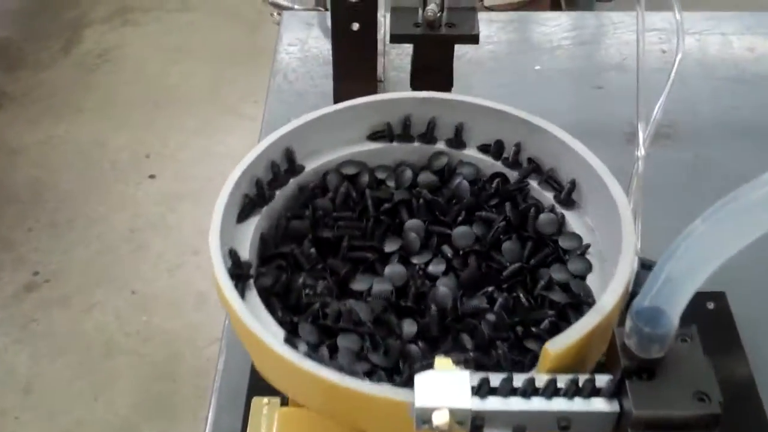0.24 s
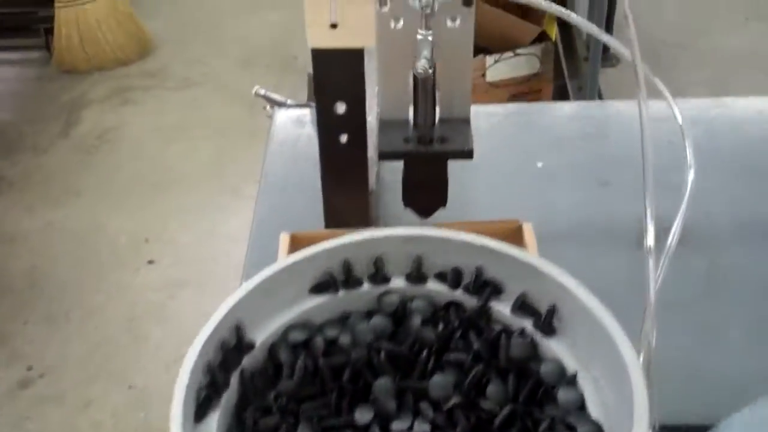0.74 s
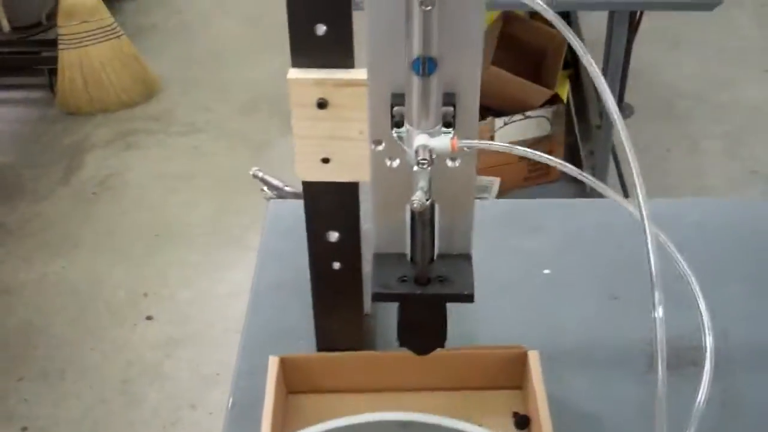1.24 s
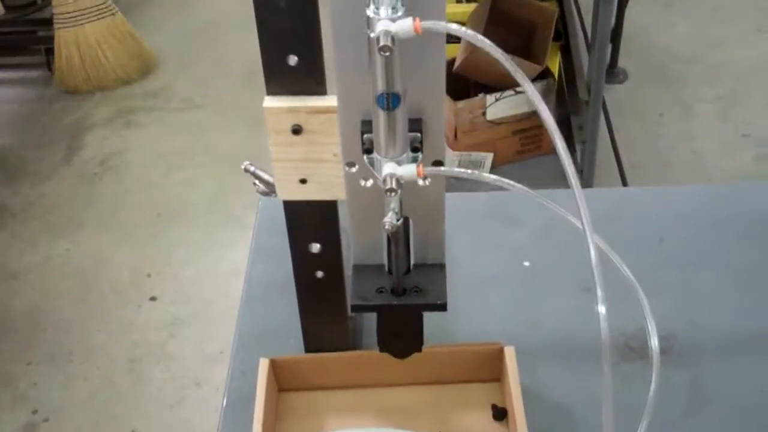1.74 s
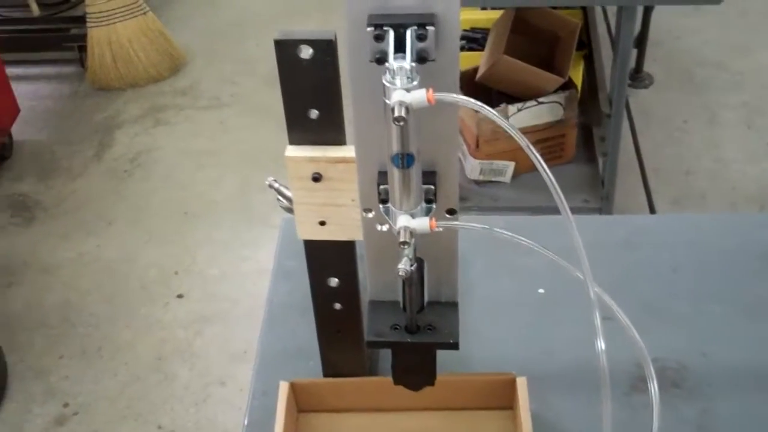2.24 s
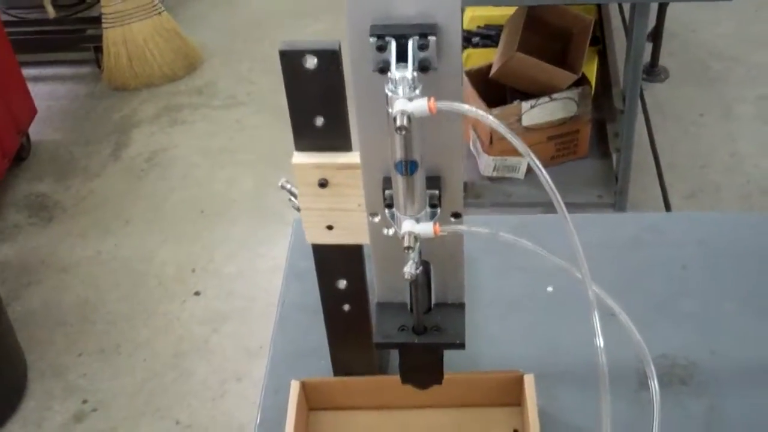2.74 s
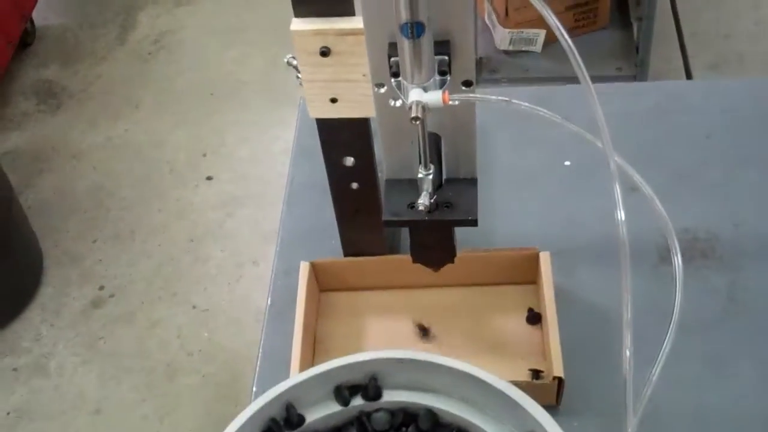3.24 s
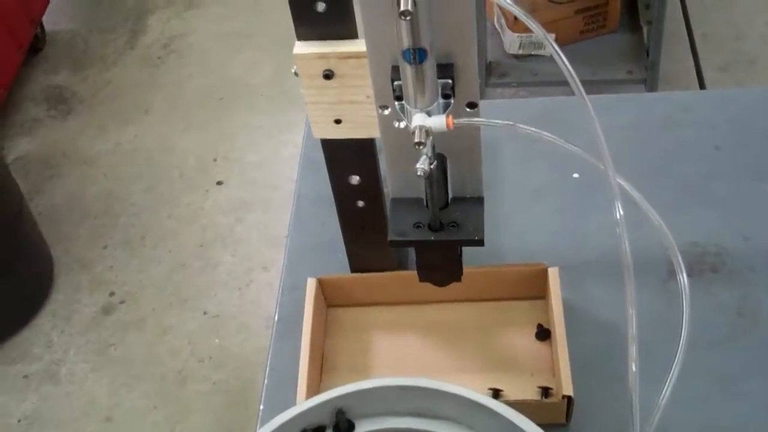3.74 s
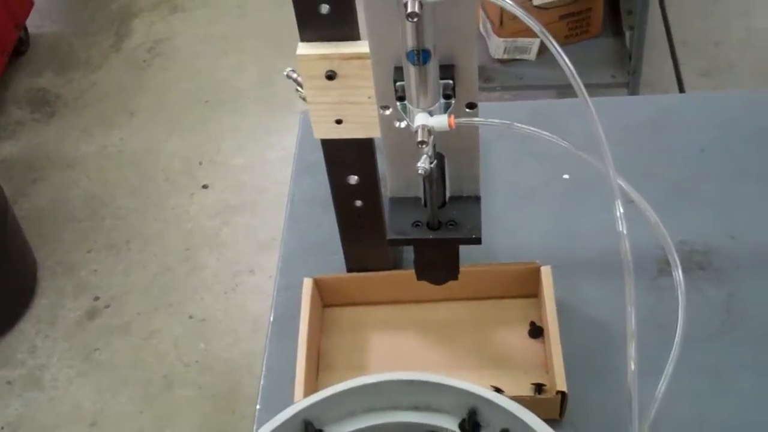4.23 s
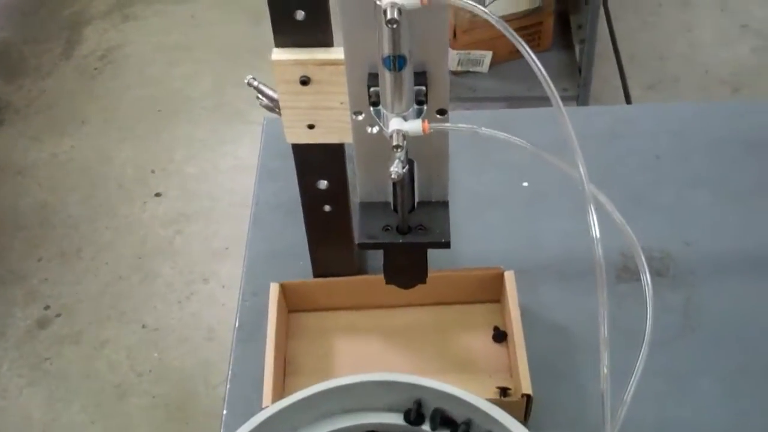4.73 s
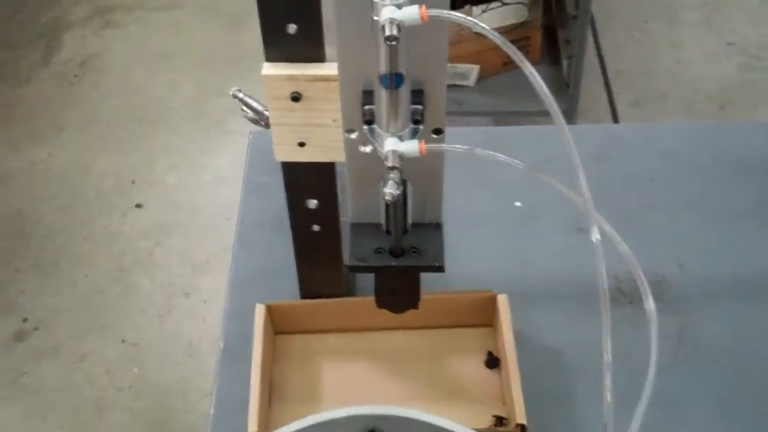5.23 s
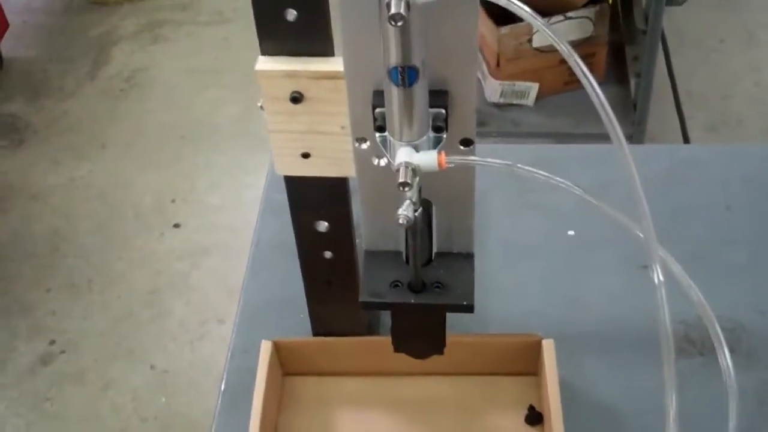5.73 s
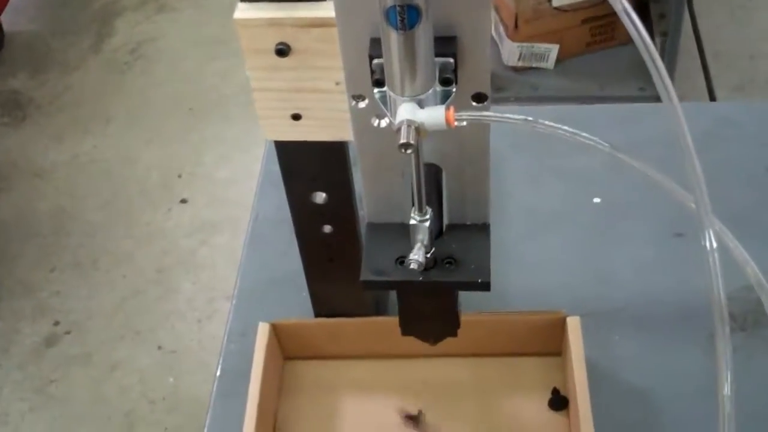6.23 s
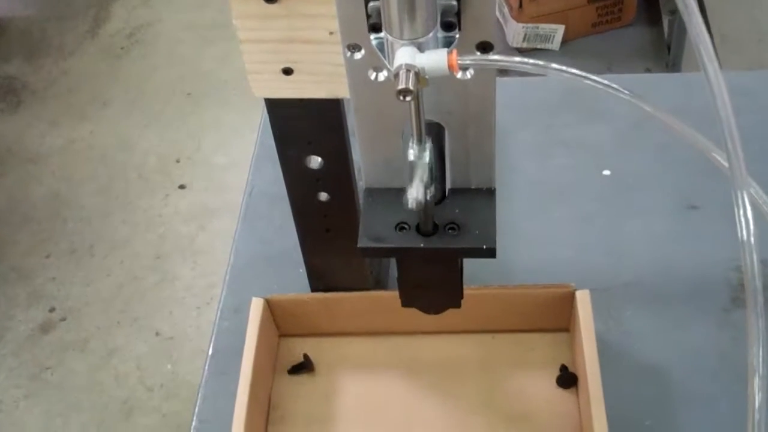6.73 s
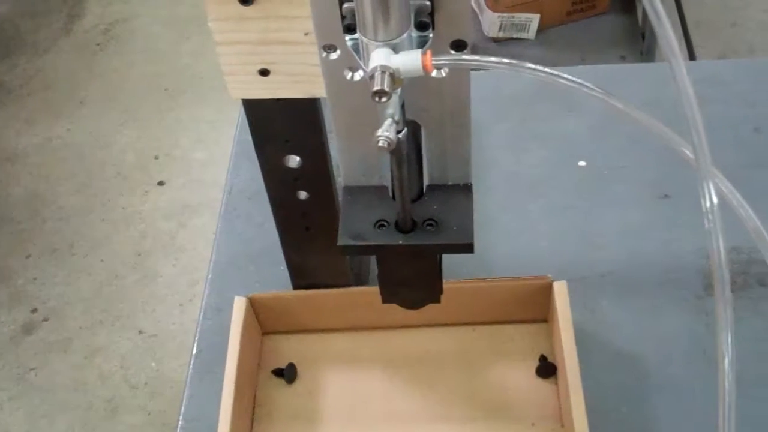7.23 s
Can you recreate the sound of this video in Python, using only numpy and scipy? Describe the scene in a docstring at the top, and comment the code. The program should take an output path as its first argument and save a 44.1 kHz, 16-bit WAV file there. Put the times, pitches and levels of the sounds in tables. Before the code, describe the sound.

A loud, bright compressed-air hiss runs throughout, with a steady low hum near 120 Hz and light chatter from a vibrating bowl of plastic fasteners. Right at the start a valve spits, a cylinder clacks, and a fastener taps into a wooden box at about 0.1 s, bouncing softly. At 0.5 s another spit and small tap precede the piston's return clack at 0.8. Around 1.5 an escapement scrapes and knocks; from 1.8 to 2.3 feed air roars, popping and buffeting the close microphone, mostly on the right. It shuts with a spit and knock, and the hiss sags briefly. The cycle repeats: drive at 3.2, return clack at 3.7, knock at 4.4, longer blast from 4.7 to 5.4. The hiss grows nearer and sharper. A third drive comes at 6.2, a strong return clack at 6.9, and a final knock at 7.4. Short shop reverberation.

```python
"""A vibratory bowl feeder hums on a shop bench under a compressed-air jet: harmonics and chatter under shaped noise.
Three times an air cylinder drives a plastic fastener into a wooden box and draws back, with filtered-noise
valve spits and decaying modes for the blows; then an escapement scrapes and knocks. After the first two knocks
a blast of feed air, gated noise, roars and buffets the microphone; the escapement slides back,
and the jet sags for a moment until the air line has refilled."""
import sys
import numpy as np
from scipy import signal
from scipy.fft import rfft, irfft
from scipy.io import wavfile

SR = 44100
rng = np.random.default_rng(int(sys.argv[2]) if len(sys.argv) > 2 else 0)


def dump_mix(stems):
    """Bounce the given channels to the path in sys.argv[1] as a 16-bit WAV at rate SR."""
    frames = np.atleast_2d(stems).T  # one column per channel
    limited = np.clip(frames, -1, 1)  # hard clip at full scale
    pcm = np.round(limited * 32767).astype(np.int16)
    wavfile.write(sys.argv[1], SR, pcm)


N = 329427
T = np.arange(N) / SR
HZ = np.fft.rfftfreq(N, 1 / SR)

# hiss as the microphone moves about the jet, before trims: time_s, level_db, beamed_sizzle_db
JET_LEVELS = [(0.15, -23.5, -25.5), (0.5, -21.5, -23.5), (0.9, -22, -21.5), (1.35, -21.5, -21.5),
              (1.7, -21, -22), (2.55, -22.5, -19), (2.85, -22, -20), (3.25, -22.0, -20), (3.7, -22, -20.5),
              (4.35, -22.5, -22), (4.55, -22.5, -20.5), (5.7, -20.5, -19.5), (6.25, -18.5, -18),
              (6.65, -17.5, -18), (7.1, -17.5, -17.5), (7.35, -17.5, -17.5)]
# spectrum of the hiss: frequency_hz, density_db
JET_SPECTRUM = [(500, -23), (1500, -17.5), (1800, -12.5), (2080, -6), (2780, -3), (2980, -2), (3900, 2),
                (4600, 1), (5600, -1.5), (7000, 3), (9000, 7.5), (10000, 5), (11500, 4), (13400, 5.5),
                (14100, 5)]
# left-right likeness of the hiss: frequency_hz, likeness_0_to_1
JET_LIKENESS = [(500, .6), (1500, .85), (3000, .992), (5000, .99), (6300, .74), (9000, .7), (12000, .6),
                (14000, .7)]
# phase by which left leads in the hiss: frequency_hz, lead_rad
JET_PHASE_LEAD = [(100, 0), (5200, 0), (8000, -.7), (10000, -1.1), (12000, -1.35), (14000, -1.75)]
# lower shoulder of the hiss, below its edge: time_s, level_db
SHOULDER_LEVELS = [(0.2, -38), (0.5, -38.5), (1.0, -38.5), (1.25, -38.5), (1.45, -38.5), (1.6, -33),
                   (1.75, -34.5), (2.45, -40), (2.8, -41), (3.35, -38.5), (4.05, -41), (4.38, -40),
                   (4.55, -33.5), (5.6, -40.5), (6.0, -39.5), (6.35, -37.5), (6.7, -37.5), (6.95, -37),
                   (7.3, -38.5)]
# crossover from the shoulder to the rest of the hiss: lower_hz, upper_hz
SHOULDER_EDGE = [2750, 2950]
# loss of jet pressure after each blast: sag_start_s, pressure_back_s
PRESSURE_SAGS = [(2.277, 2.405), (5.39, 5.545)]
SAG_FALL_S, REFILL_S = 0.06, 0.049
SAG_BODY_DB, SAG_TREBLE_DB, SAG_SIZZLE_DB = -2.5, -5.5, -5.5
# the body of the hiss, its balance and the rattle in the bowl all follow the rise above this level
USUAL_DB = -21.4
BODY_DB, BODY_SHARE = -25.5, 0.75
PAN_DB, PAN_SHARE = .5, 0.2
# the stereo image narrows as the microphone turns into the beam of sizzle
WIDTH_DB, NARROWING_SHARE = 0.45, 0.69

HUM_HZ = 119.9
# fundamental of the feeder's hum: time_s, rms_level_db
HUM_LEVELS = [(0.1, -44.5), (0.4, -42.0), (1.6, -43.5), (2.5, -46), (3.85, -44.5), (5.7, -43.5),
              (6.55, -42.5), (6.8, -39), (7.35, -42.5)]
# odd harmonics relative to the hum: harmonic_number, level_db
ODD_HARMONICS = [(3, -18), (5, -21.5)]
# second harmonic of the hum: time_s, rms_level_db
SECOND_HARMONIC_LEVELS = [(0.4, -52.5), (0.9, -52), (1.3, -65), (2.6, -52.5), (3.0, -70), (3.3, -61),
                          (4.25, -56), (5.75, -64), (6.05, -55)]
# ring of the bowl at the fourth harmonic: time_s, rms_level_db
BOWL_RING_LEVELS = [(2.6, -60.5), (5.6, -57), (5.75, -45.5), (6.1, -45.5), (6.27, -49), (6.45, -45.5),
                    (6.72, -48.5), (6.95, -55), (7.25, -46)]
# spectrum of the chattering fasteners: frequency_hz, density_db
RATTLE_SPECTRUM = [(25, -10), (80, 0.5), (170, 1.5), (300, 0), (430, 6), (650, 3.5), (950, 5.5),
                   (1250, 2.5), (2000, 3), (5000, -50)]
RATTLE_DB, RATTLE_SHARE = -49, 1
# singing rim of the bowl: time_s, rms_level_db
RIM_LEVELS = [(0.3, -51.5), (1.3, -50.5), (4.3, -50.5), (5.8, -63)]
RIM_HZ, RIM_WIDTH_HZ = 1079, 80

# the piston drives a fastener out: spit_s, spit_db, spit_hz, spit_length_s, travel_s, plate_knock_db,
# clack_db, flight_s, landing_db, jolt_db
DRIVE_STROKES = [(0.02, -4.5, 11700, 0.0075, 0.016, -24.5, -18, 0.072, -18.5, -28),
                 (3.189, -10, 11800, 0.0087, 0.016, -17.5, -15, 0.082, -24, -38),
                 (6.17, -7, 11660, 0.01, .016, -15, -15, .082, -18, -36)]
PUSH_WIDTH_HZ = 580
# a faint clatter of piston and plate, about 4 ms before each drive stroke's valve spit;
# its lead is counted from the end stop and its level from the blow there
CLATTER_LEAD_S, CLATTER_DB = 0.02, -11
# the fastener bounces once in the box
BOUNCE_S, BOUNCE_DB = 0.15, -8
# the piston draws back: spit_s, spit_db, spit_length_s, track_tap_delay_s, track_tap_db, travel_s,
# plate_knock_db, clack_db, plate_brightness_db_per_octave
RETURN_STROKES = [(0.512, -12.5, 0.011, .037, -25, 0.2985, -31.5, -11, 16.5),
                  (3.397, -11.5, 0.0066, .032, -24.5, .292, -17, -15, -0.5),
                  (6.588, -17, 0.016, .033, -22, .2935, -12.5, -8.5, -3)]
RETURN_HZ, RETURN_WIDTH_HZ = 10770, 1900
# clack of the piston on its end stop: mode_hz, mode_db, t60_s
CYLINDER_MODES = [(2760, -2, 0.018), (3140, 2, 0.0073), (3380, 0.5, 0.014), (3530, -8, 0.026),
                  (4870, -0.5, 0.015), (6700, 3.5, 0.014)]
# knock of the mounting plate just after each clack: mode_hz, mode_db, t60_s
PLATE_MODES = [(1342, -5, 0.084), (1450, -0.5, 0.042), (1590, -2, 0.026), (1735, 3.5, 0.028),
               (1850, -1, 0.04)]
PLATE_DELAY_S = .0008
# landing in the box: mode_hz, mode_db, t60_s
BOX_MODES = [(424, -13.5, 0.03), (865, -12, 0.018), (1220, -5, 0.01), (1680, -7, 0.012), (2620, 5.5, 0.01),
             (3520, -3, 0.006)]
# the next fastener taps into place in the track: mode_hz, mode_db, t60_s
TRACK_MODES = [(520, -7, .02), (820, -3, 0.012), (1150, -5.5, .016), (1550, -11, 0.009), (2100, -10, .012)]
# delay of a drive stroke's jolt, time for any jolt to rise to its peak
PUSH_JOLT_DELAY_S, JOLT_S = 0.00095, 0.00067

# the escapement lets one fastener through: spit_s, spit_db, thump_delay_s, knock_db,
# knock_brightness_db_per_octave, scrape_db, jolt_db
ESCAPEMENT_RELEASES = [(1.510, -11, 0.016, -17.5, 1.5, -22.5, -22),
                       (4.425, -18, .024, -18.5, 0.5, -22.5, -32), (7.417, -13, 0.017, -21, 4, -20, -26)]
RELEASE_HZ, RELEASE_WIDTH_HZ, RELEASE_SPIT_S = 8600, 1500, 0.0056
# it ticks as it sets off, and thumps with one quick rebound
SET_OFF_S, SET_OFF_DB, SLIDE_S, REBOUND_S, REBOUND_DB = .001, -9, .021, .008, -5
# knock of the escapement: mode_hz, mode_db, t60_s
ESCAPEMENT_MODES = [(441, 1, 0.069), (464, 3, 0.082), (594, -13, 0.036), (772, 0.5, 0.061),
                    (1035, 2, 0.055), (1070, 0, 0.06), (1164, -6, 0.037), (1530, -4, 0.035),
                    (2680, 2.5, 0.03), (2850, -1, 0.03)]
# click of its catch: mode_hz, mode_db, t60_s
CATCH_MODES = [(2830, -3, .025), (4700, -13, 0.013), (10700, 3, 0.034)]
CATCH_S, CATCH_DB = 0.029, -17

# feed air: start_s, end_s, roar_db, microphone_pressure_db
FEED_BLASTS = [(1.762, 2.262, -15, -6.5), (4.665, 5.36, -15.5, -7)]
# spectrum of the roar: frequency_hz, density_db
BLAST_SPECTRUM = [(40, 1.5), (150, -3), (400, 3.5), (800, 2.5), (1800, 2.5), (3000, 5.5), (4100, 3),
                  (6000, 7), (7200, 5), (8600, 8.5), (10300, 1.5), (11750, 7.5), (12900, 6.5), (14000, 3.5)]
# left-right likeness of the roar: frequency_hz, likeness_0_to_1
BLAST_LIKENESS = [(100, .2), (1500, .3), (3300, .55), (6500, .35), (10000, .6), (11700, .8), (13500, .9)]
# phase by which left leads in the roar: frequency_hz, lead_rad
BLAST_PHASE_LEAD = [(100, 0), (5200, -.2), (7200, -1.6), (10000, -2.2), (11700, -2.4), (13500, -2.7)]
# largest eddies popping on the right port, before a common trim: time_s, peak_db, sign (1 push, -1 suction)
EDDY_POPS = [(1.797, -3, 1), (1.805, -1, 1), (1.816, -4, 1), (1.887, -5, 1), (1.910, -4, 1), (1.982, -4, 1),
             (1.986, -4, 1), (2.043, -3, 1), (2.137, -4, 1), (2.229, 1, 1), (2.230, 1, -1), (2.250, -5, 1),
             (4.680, -1, 1), (4.689, -1, 1), (4.850, 1, 1), (5.029, -4, 1), (5.031, -5, 1), (5.086, 0, 1),
             (5.226, -3, 1), (5.273, -4, 1), (5.318, -4, -1)]
POP_TIME_S = .0003
# smaller ones sputter at random
SPUTTER_PER_S, SPUTTER_DB, SPUTTER_SPREAD_DB = 40, -14, 3
# after each blast a valve spits and the escapement slides back
RESET_DELAY_S, RESET_SLIDE_S = .011, .0235
RESET_SPIT_DB, RESET_HZ, RESET_WIDTH_HZ, RESET_SPIT_S = -14, 9300, 440, 0.0064
RESET_KNOCK_DB, RESET_SCRAPE_DB = -22, -25

EDGE_HZ = 14290  # upper band limit


def gain_of(db):
    """Logarithmic level: decibels to an amplitude factor."""
    return 10 ** (np.asarray(db) / 20)


def evened(x):
    """Power normalisation: scales to rms 1."""
    return x / np.sqrt(np.mean(x ** 2) + 1e-20)


def read(points, hz):
    """Logarithmic pitch scale: interpolates a table on a log-frequency axis."""
    f, value = np.transpose(points)
    return np.interp(np.log(hz + 1), np.log(f + 1), value)


def follow(table):
    """Linear interpolation: gives each column of a curve at every sample."""
    s, *columns = np.transpose(table)
    return [np.interp(T, s, c) for c in columns]


def add(mix, s, sound):
    """Superposition: mixes a stereo sound in at time s."""
    part = mix[:, max(round(s * SR), 0):][:, :sound.shape[1]]
    part += sound[:, :part.shape[1]]


def drift(rate_hz):
    """Low-passed random fluctuation of rms 1."""
    return evened(irfft(rfft(rng.standard_normal(N)) / (1 + (HZ / rate_hz) ** 2), N))


def band(x, lo, hi):
    """Ideal band-pass filter."""
    return irfft(rfft(x) * ((HZ > lo) & (HZ < hi)), N)


def noise(colour, same, lead, lo, hi):
    """Partial coherence: noise at two ports whose mean has the given colour, and rms 1 in the band lo-hi."""
    a, b = rfft(rng.standard_normal((2, N)))
    same = np.clip(same, 0, .995)
    right = (same * a + np.sqrt(1 - same ** 2) * b) * np.exp(-1j * lead)
    shared = np.sqrt(1 + same * np.cos(lead))  # ports that are out of step partly cancel in the mean
    pair = irfft(np.array([a, right]) * gain_of(read(colour, HZ)) / shared, N)
    return pair / band(pair.mean(0), lo, hi).std()


def gate(t, start, end, rise, fall):
    """Exponential flow transient: a valve opens quickly and the flow dies away after it shuts."""
    opening = 1 - np.exp(-np.maximum(t - start, 0) / rise)
    return opening * np.exp(-np.maximum(t - end, 0) / fall)


def sag():
    """Supply depletion and refill: share 0-1 by which the jet has lost its pressure after a blast."""
    return sum(np.clip((T - s) / SAG_FALL_S, 0, 1) * np.clip((e - T) / REFILL_S, 0, 1) for s, e in PRESSURE_SAGS)


def jet(flutter_db=0.6, top_flutter_db=0.07, treble_trim_db=-2.0, sizzle_trim_db=0.44,
        bench_db=-17, bench_delay=.00132):
    """Turbulent jet noise and directivity: hiss grows as the microphone nears, its beamed sizzle on its own."""
    level_db, sizzle_db = follow(JET_LEVELS)
    near_db = level_db - USUAL_DB
    body_db = BODY_DB + BODY_SHARE * near_db
    levels_db = np.array([body_db, level_db + treble_trim_db, sizzle_db + sizzle_trim_db])
    levels_db = levels_db + np.outer([SAG_BODY_DB, SAG_TREBLE_DB, SAG_SIZZLE_DB], sag())
    pan_db = PAN_DB + PAN_SHARE * near_db
    width_db = WIDTH_DB - NARROWING_SHARE * (sizzle_db - USUAL_DB)

    air = noise(JET_SPECTRUM, read(JET_LIKENESS, HZ), read(JET_PHASE_LEAD, HZ), 2500, 5500)
    late = T - bench_delay * (1 + 0.054 * drift(0.73))  # the path by way of the bench changes slowly
    reflected = np.array([np.interp(np.round(late * SR), np.arange(N), port) for port in air])
    air = air + gain_of(bench_db) * reflected
    spectrum = rfft(air)
    above = np.interp(HZ, SHOULDER_EDGE, [0, 1])
    shoulder = irfft(spectrum * (1 - above), N)
    out = shoulder * gain_of(follow(SHOULDER_LEVELS)[0]) / band(air.mean(0), 1800, 2750).std()

    # body, treble and sizzle: each is levelled in its zone and cross-faded between the centres
    zones = [(2500, 5500), (6500, 11000), (11500, 14200)]
    centres = [4500, 8500, 13000]
    beam = gain_of(top_flutter_db * drift(21) + pan_db * np.array([[.5], [-.5]]))
    for (lo, hi), shares, db, sway in zip(zones, np.eye(len(zones)), levels_db, [1, beam, beam]):
        part = irfft(spectrum * above * np.interp(HZ, centres, shares), N)
        out += part * sway * gain_of(db) / band(air.mean(0), lo, hi).std()
    middle = out.mean(0)
    return (middle + (out - middle) * gain_of(width_db)) * gain_of(flutter_db * drift(16))


def feeder(waver_db=2, pan_db=-3.0, clump_db=1.4):
    """Forced vibration: the magnet shakes the bowl at twice the mains rate; thrown fasteners chatter."""
    (hum_db,), (second_db,) = follow(HUM_LEVELS), follow(SECOND_HARMONIC_LEVELS)
    (ring_db,), (rim_db,) = follow(BOWL_RING_LEVELS), follow(RIM_LEVELS)
    rattle_db = RATTLE_DB + RATTLE_SHARE * (follow(JET_LEVELS)[0] - USUAL_DB)
    turn = 2 * np.pi * HUM_HZ * T
    hum = np.sin(turn)
    for multiple, db in ODD_HARMONICS:
        overtone = np.sin(round(multiple) * turn + 2 * np.pi * rng.random())
        hum = hum + gain_of(db + waver_db * drift(0.97)) * overtone
    bowl = gain_of(second_db) * np.sin(2 * turn) + gain_of(ring_db + .7 * drift(5)) * np.sin(4 * turn)
    tones = gain_of(hum_db) * hum + bowl
    chatter = noise(RATTLE_SPECTRUM, read([(60, .7), (700, .6), (2000, .85)], HZ), 0, 600, 1150)
    throw = (1 + 0.26 * np.sin(turn)) * gain_of(rattle_db + clump_db * drift(40))
    # the chatter sets the bowl's rim singing
    resonance = 1 / (1 + ((HZ - RIM_HZ) / (RIM_WIDTH_HZ / 2)) ** 2)
    rim = evened(irfft(rfft(rng.standard_normal(N)) * resonance, N))
    return np.sqrt(2) * tones + rim * gain_of(rim_db) + chatter * throw * gain_of([[pan_db], [-pan_db]])


def struck(rows, modes, rise, crack_db, crack_hz, crack_time, spread, scatter=1):
    """Modal excitation: a blow gives a short crack and decaying modes, varied per blow; glancing ones are brighter."""
    out, t = np.zeros((2, N)), np.arange(SR // 4) / SR
    hz, mode_db, t60 = np.transpose(modes)[:, :, None]
    octaves = np.log2(hz / 1000)
    crack_filter = signal.butter(1, [crack_hz / 4, min(crack_hz, SR / 3)], "band", fs=SR)
    for s, db, *brightness in rows:
        phase = 2 * np.pi * scatter * rng.random(hz.shape) + spread * rng.standard_normal((2, *hz.shape))
        size = gain_of(mode_db + sum(brightness) * octaves)
        pitch = hz * (1 + .015 * rng.standard_normal(hz.shape))
        decay = np.exp(-np.log(1000) * t / t60)
        ring = (size * decay * np.sin(2 * np.pi * pitch * t + phase)).sum(1)
        grit = rng.standard_normal(len(t)) + spread * rng.standard_normal((2, len(t)))
        grit = evened(signal.lfilter(*crack_filter, grit))
        crack = gain_of(crack_db) * grit * np.exp(-t / crack_time)
        add(out, s, gain_of(db) * (ring + crack) * (1 - np.exp(-t / rise)))
    return out


def shop(x, t60=0.19):
    """Reverberation: sparse, exponentially weaker reflections from the bench and the walls."""
    t = np.arange(SR // 2) / SR
    present = (rng.random((2, len(t))) < 2500 / SR) * (t > .003)
    taps = rng.standard_normal((2, len(t))) * present * np.exp(-np.log(1000) * t / t60)
    return signal.fftconvolve(x, taps / np.linalg.norm(taps[0]), axes=1)[:, :N]


def spits(spurts, puff_db=-11, lead=0.87):
    """Orifice flow noise: a short whistling spurt through a valve port, with a broad puff of air."""
    out, t = np.zeros((2, N)), np.arange(4096) / SR
    f = np.fft.rfftfreq(len(t), 1 / SR)
    for s, db, hz, width, length in spurts:
        z = rfft(rng.standard_normal(len(t))) / (1 + ((f - hz) / (width / 2)) ** 2)
        whistle = irfft(np.array([z, z * np.exp(1j * lead)]))
        flow = gate(t, 0, length, 0.00051, 0.00056)
        whistle = whistle * flow
        whistle = whistle / np.sqrt(np.sum(whistle[0] ** 2) / np.sum(flow ** 2))
        puff = flow * rng.standard_normal((2, len(t)))
        add(out, s, gain_of(db) * (whistle + gain_of(puff_db) * puff))
    return out


def jolts():
    """Impulsive recoil: the machine jerks on the bench, one dull push of air per drive stroke and release."""
    rows = [(s + PUSH_JOLT_DELAY_S, db) for s, *_, db in DRIVE_STROKES]
    rows += [(s + SLIDE_S, db) for s, *_, db in ESCAPEMENT_RELEASES]
    out, u = np.zeros((2, N)), np.arange(SR // 50) / SR / JOLT_S
    for s, db in rows:
        add(out, s - JOLT_S, gain_of(db) * np.outer([1, 1], u * np.exp(1 - u)))
    return out


def scrapes(slides, travel=0.021):
    """Sliding friction: broadband rubbing as the escapement slides for a moment."""
    colour = [(40, 14), (300, 3), (1200, 4.0), (2600, 13), (6000, 11.0), (13000, -1)]
    rub = noise(colour, 0.62, 0, 100, 18000)
    return rub * sum(gain_of(db) * gate(T, s - travel, s + 0.0085, 0.0038, 0.015) for s, db in slides)


def blasts(flutter_db=0.5, fall=0.027):
    """Turbulent discharge: feed air roars out, its middle surging slowly and its low end coming in gusts."""
    roar = noise(BLAST_SPECTRUM, read(BLAST_LIKENESS, HZ), read(BLAST_PHASE_LEAD, HZ), 150, 14000)
    pan_db = read([(700, 0), (2500, -1), (8000, 3.0), (13000, 0)], HZ)  # positive leans left
    roar = irfft(rfft(roar) * gain_of(pan_db * np.array([[.5], [-.5]])), N)
    low, middle, top = band(roar, 0, 1800), band(roar, 1800, 5500), band(roar, 5500, SR)
    roar = low * gain_of(1.7 * drift(45)) + middle * gain_of(1.2 * drift(8)) + top
    flow = sum(gain_of(db) * gate(T, s, e, 0.0027, fall) for s, e, db, _ in FEED_BLASTS)
    return roar * flow * gain_of(flutter_db * drift(60))


def buffet(eddies_per_s=700, eddy_db=-30, eddy_hz=300, leak_hz=12.0, left_db=-6, pop_db=-2, early=0.0058):
    """Flow pressure on the microphone: the stream presses on the right port most; eddies thump and pop."""
    push = sum(gain_of(db) * gate(T, s, e - early, 0.014, 0.025) for s, e, _, db in FEED_BLASTS)
    flow = push / push.max()
    eddies = np.minimum(rng.exponential(1, (2, N)), 3) * (rng.random((2, N)) < eddies_per_s / SR)
    eddies = evened(signal.lfilter(*signal.butter(1, [15, eddy_hz], "band", fs=SR), eddies))
    sputter = gain_of(SPUTTER_DB + SPUTTER_SPREAD_DB * rng.standard_normal(N))
    pops = flow * (rng.random(N) < SPUTTER_PER_S / SR) * sputter
    for s, db, sign in EDDY_POPS:
        pops[round(s * SR)] = sign * gain_of(db)
    u = np.arange(-200, 201) / SR / POP_TIME_S
    pops = signal.oaconvolve(pops, (1 + u ** 2) ** -1.5, "same")
    pressure = push + gain_of(eddy_db) * eddies * flow + gain_of(pop_db) * np.outer([.12, 1], pops)
    pressure = signal.lfilter(*signal.butter(1, leak_hz, "high", fs=SR), pressure)  # steady pressure leaks away
    return pressure * gain_of([[left_db], [0]])


def cycle():
    """Sequence of flow and impact: lists the spits, piston blows, knocks, slides, landings and taps."""
    spurts, blows, knocks, slides, landings, taps = [], [], [], [], [], []
    for s, spit_db, hz, length, travel, knock_db, clack_db, flight, landing_db, _ in DRIVE_STROKES:
        out = s + travel
        spurts += [(s, spit_db, hz, PUSH_WIDTH_HZ, length)]
        blows += [(out - CLATTER_LEAD_S, knock_db + CLATTER_DB, clack_db + CLATTER_DB), (out, knock_db, clack_db)]
        landings += [(out + flight, landing_db), (out + flight + BOUNCE_S, landing_db + BOUNCE_DB)]
    for s, spit_db, length, tap_delay, tap_db, travel, knock_db, clack_db, brightness in RETURN_STROKES:
        spurts += [(s, spit_db, RETURN_HZ, RETURN_WIDTH_HZ, length)]
        taps += [(s + tap_delay, tap_db)]
        blows += [(s + travel, knock_db, clack_db, brightness)]
    for s, spit_db, thump_delay, knock_db, brightness, scrape_db, _ in ESCAPEMENT_RELEASES:
        thump = s + thump_delay
        spurts += [(s, spit_db, RELEASE_HZ, RELEASE_WIDTH_HZ, RELEASE_SPIT_S)]
        knocks += [(s + SET_OFF_S, knock_db + SET_OFF_DB, brightness), (thump, knock_db, brightness),
                   (thump + REBOUND_S, knock_db + REBOUND_DB, brightness)]
        slides += [(s + SLIDE_S, scrape_db)]
    for _, end, *_ in FEED_BLASTS:
        s = end + RESET_DELAY_S
        spurts += [(s, RESET_SPIT_DB, RESET_HZ, RESET_WIDTH_HZ, RESET_SPIT_S)]
        knocks += [(s + RESET_SLIDE_S, RESET_KNOCK_DB)]
        slides += [(s + RESET_SLIDE_S, RESET_SCRAPE_DB)]
    return spurts, blows, knocks, slides, landings, taps


def scene():
    """Superposition of air, feeder and moving parts, with the shop's reflections of blows and spits."""
    spurts, blows, knocks, slides, landings, taps = cycle()
    clacks = [(s, db) for s, _, db, *_ in blows]
    thuds = [(s + PLATE_DELAY_S, db, *brightness) for s, db, _, *brightness in blows]
    catches = [(s + CATCH_S, CATCH_DB) for s, *_ in ESCAPEMENT_RELEASES]
    hits = struck(clacks, CYLINDER_MODES, rise=.0002, crack_db=-1, crack_hz=10000, crack_time=.004, spread=.25)
    hits += struck(thuds, PLATE_MODES, rise=.0007, crack_db=-14, crack_hz=2000, crack_time=.005,
                   spread=.2, scatter=.15)
    hits += struck(landings, BOX_MODES, rise=0.00022, crack_db=-22, crack_hz=3000, crack_time=0.0043, spread=0.18)
    hits += struck(taps, TRACK_MODES, rise=0.00037, crack_db=-1, crack_hz=2400, crack_time=0.0033, spread=.25)
    hits += struck(knocks, ESCAPEMENT_MODES, rise=0.0048, crack_db=-2, crack_hz=1800, crack_time=0.01, spread=0.13)
    hits += struck(catches, CATCH_MODES, rise=0.0003, crack_db=-6, crack_hz=9000, crack_time=0.003, spread=0.25)
    valves = spits(spurts)
    room = gain_of(-11.0) * shop(hits) + gain_of(-4.5) * shop(valves)
    return jet() + feeder() + hits + valves + room + jolts() + scrapes(slides) + blasts() + buffet()


def record(dry):
    """Amplitude limiting and low-pass filtering: overload on the highest peaks, then the band limit."""
    low_pass = signal.firwin(1023, EDGE_HZ, window=("kaiser", 9), fs=SR)
    return signal.oaconvolve(np.clip(dry, -1, 1), low_pass[None], "same")


dry = scene()
out = record(dry)
dump_mix(out)
```